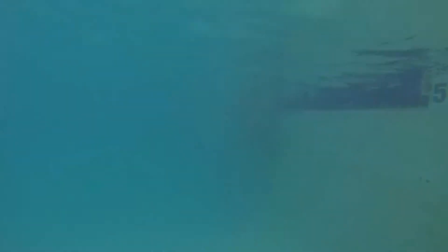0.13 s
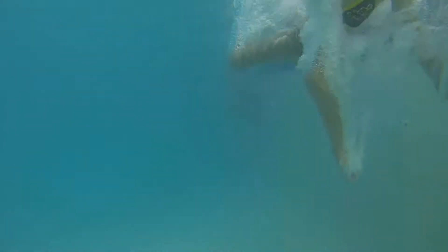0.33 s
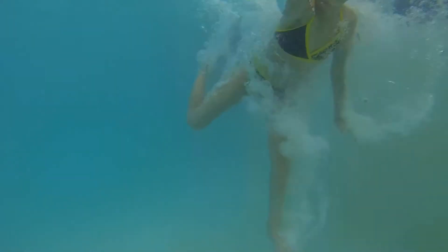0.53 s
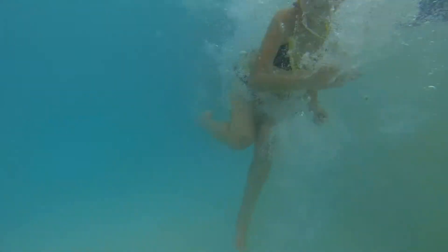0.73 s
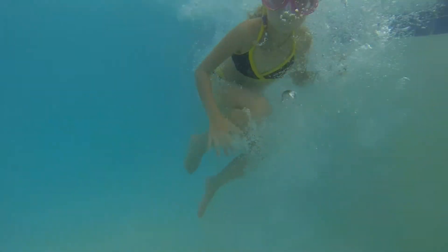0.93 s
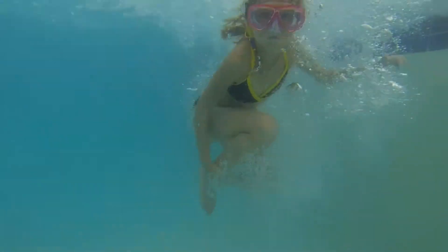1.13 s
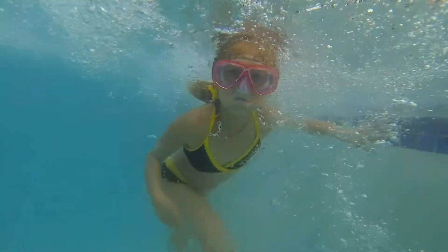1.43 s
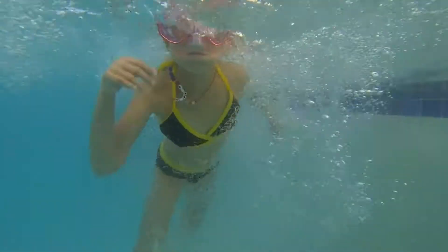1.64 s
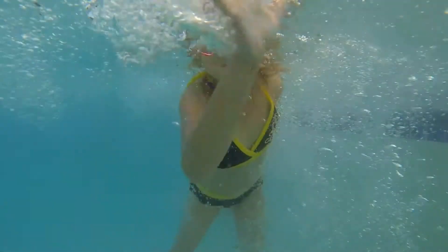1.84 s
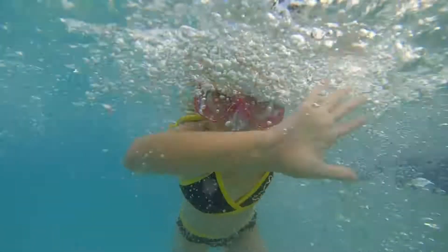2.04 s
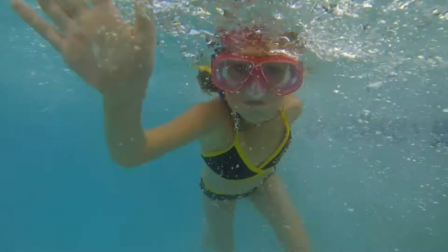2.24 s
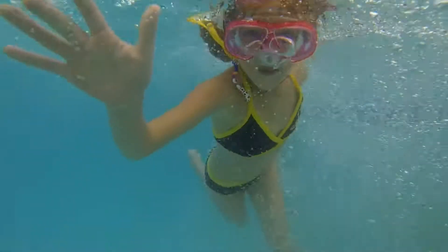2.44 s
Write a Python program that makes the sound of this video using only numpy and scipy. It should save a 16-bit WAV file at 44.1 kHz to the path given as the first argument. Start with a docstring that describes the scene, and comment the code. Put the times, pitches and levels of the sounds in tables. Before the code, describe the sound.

An underwater splash as a swimmer jumps into a pool: quick slaps break the surface and low surges push against the sunken microphone. Dull, hollow bubbling follows, with single bubbles plopping nearby and a few brief swishes.

```python
"""A low underwater swirl, then slaps and a rush of bubbles: a swimmer plunges into a pool.
Limbs slap through the surface and drag down air, which breaks into swarms of bubbles, huge to fine.
Single bubbles ring and glug close by, thin air films snap, and surges push the sealed housing of the
submerged microphone. The housing's resonances colour the swarms, slaps and swishes."""
import sys
import numpy as np
from scipy import signal
from scipy.io import wavfile

SR = 44100
rng = np.random.default_rng(int(sys.argv[2]) if len(sys.argv) > 2 else 0)


def waveform_to_disk(signal):
    """Save audio, clipped to [-1, 1], as 16-bit WAV at the path in sys.argv[1]."""
    frames = np.transpose(np.atleast_2d(signal))
    scaled = np.clip(frames, -1, 1) * 32767
    samples = np.round(scaled).astype(np.int16)
    wavfile.write(sys.argv[1], SR, samples)


N = 114660
ROUGH_DB, ROUGH_HZ = 4.5, 190   # neighbours jostle a bubble: level spread, rate


def amp(db):
    """Decibels to gain."""
    return 10 ** (np.asarray(db) / 20)


def unit_rms(x):
    """Scale to rms 1."""
    return x / np.sqrt(np.mean(x ** 2) + 1e-20)


def unit_peak(x):
    """Scale to peak 1."""
    return x / np.abs(x).max()


def drift(rate_hz):
    """Smooth random curve, rms 1."""
    r = np.exp(-2 * np.pi * rate_hz / SR)
    return unit_rms(signal.lfilter([1], [1, -2 * r, r * r], rng.standard_normal(N + SR))[SR:])


def butter(x, hz, kind, order=2):
    """Butterworth low- or high-pass."""
    return signal.sosfilt(signal.butter(order, min(hz, .45 * SR), kind, fs=SR, output="sos"), x)


def add(out, start_s, sound):
    """Mix a sound in at start_s."""
    i = int(start_s * SR)
    out[i:i + len(sound)] += sound[:len(out) - i]


def burst(length_s, noise):
    """Noise that peaks at a third of length_s and dies away, bass thinned."""
    age = np.arange(len(noise)) / SR / length_s
    return signal.lfilter([1, -.9], [1], noise * 3 * age * np.exp(1 - 3 * age))


def housing(x):
    """Housing wall: a dull direct path plus steep parallel resonances of alternating sign."""
    # Wall resonances. Each row: centre in Hz, width in Hz, gain in dB.
    modes = [(350, 148, -6), (463, 187, -8.5), (599.7, 96.4, 5.5), (934, 260, -7.5), (1320, 210, -18.5),
             (1559, 180, -7.5), (1740, 534, -15), (2450, 950, -23.5), (3285, 417, -26.5), (3980, 1500, -39),
             (6500, 1800, -54), (8800, 900, -52.5), (11500, 4600, -76)]
    out = amp(-1.5) * butter(x, 275, "low", order=4)
    for k, (hz, width_hz, db) in enumerate(modes):
        r = np.exp(-np.pi * width_hz / SR)
        stage = [(1 - r * r) / 2, 0, (r * r - 1) / 2, 1, -2 * r * np.cos(2 * np.pi * hz / SR), r * r]
        out = out + amp(db) * (-1) ** k * signal.sosfilt([stage, stage], x + 1e-18)
    return out


def swarm(level_db, low_hz, high_hz, births_per_s, t60_cycles, clump_db, wash_db, pitches=16):
    """Bubbles born in random clumps ring a few cycles each, over a wash of distant ones."""
    # The cloud thins to separate, nearer bubbles: start in s, end in s, share still born,
    # extra size spread in dB.
    thinning = (1.0, 1.6, .35, 1.3)
    start_s, end_s, share, extra_db = thinning
    thinned = np.clip((np.arange(N) / SR - start_s) / (end_s - start_s), 0, 1)
    clump = amp(clump_db * drift(rate_hz=22))
    birth_chance = births_per_s * share ** thinned * clump / SR
    births = (rng.random(N) < birth_chance) * rng.choice([-1, 1], N)
    spread_db = 2.4 + extra_db * thinned
    kicks = births * amp(spread_db * np.minimum(rng.exponential(1, N), 4.3))
    pitch_index = rng.integers(0, pitches, N)
    rings = np.zeros(N)
    for k, hz in enumerate(np.geomspace(low_hz, high_hz, pitches)):
        r, w = amp(-60 * hz / (t60_cycles * SR)), 2 * np.pi * hz / SR
        stage = [0, np.sin(w), 0, 1, -2 * r * np.cos(w), r * r]
        rings += (1 - r) * signal.sosfilt([stage, stage], kicks * (pitch_index == k) + 1e-18)
    wash = butter(butter(rng.standard_normal(N), low_hz, "high"), high_hz, "low") * np.sqrt(clump)
    heard = housing(unit_rms(rings) + amp(wash_db) * unit_rms(wash) * share ** (thinned / 4))
    return amp(level_db) * unit_rms(butter(heard, 1.212 * low_hz, "high", order=4))


def slaps(click=6, shove_hz=516, echo_db=-15, echo_decay_s=.011):
    """A limb breaks the surface: click and spray ring the housing, along with a dull shove."""
    # Surface hits. Each row: start in s, peak in dB, spray length in s, low-pass in Hz,
    # high-pass in Hz, shove relative to the knock in dB.
    hits = [(0.2379, -3, 0.00574, 5000, 1400, -11.5), (0.266, -20, 0.0036, 3500, 1500, -10.5),
            (0.2952, -8.5, 0.0068, 6040, 890, -6), (0.301, -4.5, 0.019, 680, 204, -5)]
    out, t = np.zeros(N), np.arange(SR // 8) / SR
    shove = -t * shove_hz * np.exp(1 - t * shove_hz) * np.cos(np.pi * shove_hz * t)
    for start_s, db, length_s, lowpass_hz, highpass_hz, shove_db in hits:
        noise = rng.standard_normal(len(t))
        pool_echo = amp(echo_db) * np.exp(-t / echo_decay_s) * (t > length_s) * noise[::-1]
        spray = burst(length_s, noise) + pool_echo
        spray[int(length_s * SR / 4)] -= click   # first contact
        spray = butter(spray, lowpass_hz, "low", order=1)
        knock = housing(butter(spray, highpass_hz, "high", order=1))
        add(out, start_s, amp(db) * unit_peak(unit_peak(knock) + amp(shove_db) * shove))
    return out


def bubbles(swell_cycles=1.3, rise_per_t60=.033, wobble_depth=.025):
    """Close bubbles: each sine swells in clean, then climbs a little and turns ragged as it dies."""
    # Single bubbles. Each row: start in s, level in dB, starting pitch in Hz, t60 in s.
    rings = [(.2385, -10, 987, 0.017), (0.2391, -6.5, 1737, 0.017), (0.2657, -18, 1586, 0.038),
             (.352, -14.5, 497, 0.017), (0.4387, -16, 1564, 0.037), (.497, -22.5, 350, 0.14),
             (.827, -17, 604, 0.037), (.925, -12.5, 597, 0.043), (.987, -20.5, 1546, 0.043),
             (1.0531, -21, 1665, 0.021), (1.1359, -18.5, 1510, 0.024), (1.156, -23, 279, 0.098),
             (.403, -17.5, 597, 0.14), (1.549, -29.5, 2580, 0.016), (1.3045, -4, 1746, 0.017),
             (1.3045, -12.5, 2524, 0.016), (1.323, -18, 398, 0.068), (1.35, -23.5, 350.3, 0.46),
             (1.392, -24, 1950, 0.027), (1.4497, -5.5, 559, 0.048), (1.4477, -12, 341.5, 0.06),
             (1.456, -27, 2690, 0.014), (1.475, -32.5, 4700, 0.005), (1.5794, -9.5, 1682, 0.023),
             (1.5794, -14, 1870, 0.024), (1.6102, -27.5, 3960, 0.011), (1.626, -17.5, 1094, 0.028),
             (1.876, -18.5, 308, 0.07), (1.888, -13.5, 568, 0.034), (1.915, -24.5, 1880, 0.052),
             (1.968, -16.5, 604, 0.022), (2.021, -9.5, 595, 0.073), (2.025, -43.5, 4430, 0.011),
             (2.045, -19, 506, 0.082), (2.0902, -28.5, 3060, 0.023), (2.0907, -38.5, 4340, 0.013),
             (2.12, -22.5, 1860, 0.027), (2.122, -28, 2450, 0.033), (2.137, -25, 1560, 0.05),
             (2.169, -20.5, 1707, 0.03), (2.181, -20, 1483, 0.025), (2.295, -21, 575, 0.07),
             (2.319, -14.5, 563, 0.038), (2.331, -12, 574, 0.048), (2.306, -33.5, 1590, 0.023),
             (2.39, -29.5, 1580, 0.066), (2.4, -47, 4230, 0.012), (2.495, -31, 1610, 0.019),
             (2.51, -35.5, 1640, 0.035), (2.255, -26, 611, 0.17), (2.389, -21.5, 934, 0.034),
             (2.452, -29, 1150, 0.036), (2.464, -20, 554, 0.041), (2.511, -22.5, 764, 0.035),
             (2.567, -36.5, 2900, 0.014), (2.591, -39.5, 3280, 0.039)]
    out = np.zeros(N)
    jostle, wobble = amp(ROUGH_DB * drift(ROUGH_HZ)), drift(ROUGH_HZ)
    for (start_s, db, hz, t60_s), offset in zip(rings, rng.integers(0, N - SR, len(rings))):
        t = np.arange(int(1.5 * t60_s * SR)) / SR
        span = slice(offset, offset + len(t))
        envelope = (1 - np.exp(-t * hz / swell_cycles)) ** 2 * amp(-60 * t / t60_s)
        ragged = np.minimum(2 * t / t60_s, 1)
        pitch_hz = hz * (1 + rise_per_t60 * t / t60_s + wobble_depth * ragged * wobble[span])
        tone = np.sin(2 * np.pi * np.cumsum(pitch_hz) / SR)
        add(out, start_s, amp(db) * jostle[span] ** ragged * unit_peak(envelope) * tone)
    return out


def surges(t60_cycles=3.5, pull_depth=.45):
    """Water draws the housing back for half a swing, then pushes it; it settles fast."""
    # Surges. Each row: start of the push in s, peak in dB, pitch in Hz.
    pushes = [(0.243, -15.5, 31.7), (0.306, -13, 39), (0.3528, -8, 64), (0.396, -14, 70),
              (0.414, -10, 31.6), (0.4404, -3, 47.8), (0.534, -19.5, 56), (0.573, -21, 59.2),
              (0.641, -17, 35), (0.718, -9, 63), (1.149, -22.5, 33), (1.325, -15, 30), (1.507, -22, 27.7),
              (1.581, -13.5, 22.1), (1.612, -20, 110), (1.783, -25, 24), (0.44, -15.5, 150),
              (1.886, -26, 60), (2.065, -19, 24), (2.108, -22, 25.1), (2.302, -24, 31.4)]
    out = np.zeros(N)
    for push_s, db, hz in pushes:
        pull_s = .5 / hz
        t = np.arange(SR // 3) / SR - pull_s
        envelope = np.where(t < 0, pull_depth * np.cos(np.pi * hz * t), amp(-60 * t * hz / t60_cycles))
        swing = envelope * np.sin(2 * np.pi * hz * t)
        add(out, push_s - pull_s, amp(db) * swing / swing.max())
    return out


def glugs():
    """Air pockets slide in pitch as they change size; each swells fast and fades slowly."""
    # Air pockets. Each row: start in s, level in dB, first pitch in Hz, last pitch in Hz, length in s.
    pockets = [(0.05, -41.5, 390, 480, 0.037), (0.736, -19, 643, 913, 0.028), (1.61, -12, 558, 635, 0.026),
               (2.002, -24, 386, 334, 0.035), (2.019, -15, 334, 433, .065)]
    out, jostle = np.zeros(N), amp(ROUGH_DB / 2 * drift(ROUGH_HZ))
    for start_s, db, first_hz, last_hz, length_s in pockets:
        age = np.arange(int(length_s * SR)) / (length_s * SR)
        pitch_hz = first_hz + (last_hz - first_hz) * age ** 2
        tone = np.sin(2 * np.pi * np.cumsum(pitch_hz) / SR)
        add(out, start_s, amp(db) * np.sin(np.pi * np.sqrt(age)) * tone)
    return out * jostle


def swishes():
    """A limb drags air down: a broad rush, heard through the housing."""
    # Limb strokes. Each row: start in s, peak in dB, length in s, low-pass in Hz.
    strokes = [(1.603, -18.5, 0.025, 4000), (1.857, -21, 0.062, 4000), (2.007, -20, 0.061, 1160)]
    out = np.zeros(N)
    for start_s, db, length_s, lowpass_hz in strokes:
        rush = butter(burst(length_s, rng.standard_normal(SR // 2)), lowpass_hz, "low")
        add(out, start_s, amp(db) * unit_peak(housing(rush)))
    return out


def snaps(decay_s=.0006, low_hz=2800, high_hz=12000):
    """Thin air films snap: bright spits of noise, too brief to move the wall."""
    # Snapping films. Each row: start in s, peak in dB.
    films = [(0.2373, -45), (.2412, -45), (.2978, -36), (0.299, -32), (1.446, -34.5), (1.4694, -36)]
    out, t = np.zeros(N), np.arange(SR // 100) / SR
    for start_s, db in films:
        spit = rng.standard_normal(len(t)) * np.exp(-t / decay_s)
        spit = butter(butter(spit, low_hz, "high"), high_hz, "low")
        add(out, start_s, amp(db) * unit_peak(spit))
    return out


def swirl(level_db, low_hz=20, high_hz=60, lump_db=2.5, trim_db=-2):
    """Moving water rocks the housing: lumpy low noise."""
    noise = rng.standard_normal(N + SR)
    rumble = butter(butter(noise, low_hz, "high"), high_hz, "low", order=3)[SR:]
    lumps = amp(lump_db * drift(rate_hz=8.1))
    return amp(level_db + trim_db) * unit_rms(rumble * lumps)


def scene():
    """All sources summed at one microphone."""
    # Water activity. Each row: time in s, then levels in dB of the huge, large, small and fine
    # swarms and of the swirl before its trim.
    activity = [(0, -57.5, -56.5, -53.5, -72, -28.5), (.2, -92, -47.5, -52, -71.5, -30),
                (0.249, -45, -74, -55.5, -71, -25.5), (.32, -46, -44.5, -45, -56.5, -42),
                (0.342, -52, -34.5, -34, -44.5, -24), (.42, -36, -28.5, -30.5, -51.5, -22.5),
                (.47, -37.5, -29, -37.5, -61.5, -19), (0.702, -34.5, -24.5, -33.5, -50.5, -27),
                (0.85, -33.5, -24, -32, -52.5, -33.5), (0.973, -34, -26, -38.5, -56.5, -41.5),
                (1.1, -42.5, -31, -39, -57, -35.5), (1.25, -36, -31, -36, -57.5, -34),
                (1.36, -43.5, -23, -37.5, -54, -32.5), (1.5, -34, -30, -35.5, -48.5, -30),
                (1.661, -59.5, -28, -33.5, -52.5, -40.5), (1.837, -43, -42, -39.5, -60.5, -40),
                (1.876, -30, -25, -32, -56, -40), (1.96, -44, -25, -35.5, -59, -36),
                (2.049, -64, -21.5, -46.5, -57, -29.5), (2.149, -54.5, -28.5, -32.5, -56, -44),
                (2.319, -43.5, -23.5, -50.5, -60.5, -32.5), (2.439, -50, -34, -44.5, -60.5, -41.5),
                (2.6, -51, -36, -51, -66.5, -37)]
    # Swarms, huge bubbles to fine. Each row: lowest and highest pitch in Hz, base births per s,
    # t60 of one resonator stage in cycles, clumping in dB, distant wash in dB.
    size_bands = [(95.5, 256.3, 160, 8.2, 4, -4.5), (290, 1322, 1000, 5.17, 4, -1),
                  (1150, 3650, 2000, 9.4, 3.5, -4.5), (3134, 13000, 5100, 26, 3.5, -1)]
    times_s, *columns_db = np.transpose(activity)
    *swarms_db, swirl_db = [np.interp(np.arange(N) / SR, times_s, db) for db in columns_db]
    cloud = sum(swarm(db, *band) for db, band in zip(swarms_db, size_bands))
    return (cloud + slaps() + snaps() + glugs() + swishes() + bubbles() + surges() + swirl(swirl_db))[None]


def record(dry, ceiling=1.3, hiss_db=-70, cutoff_hz=15700):
    """Sub-bass cut, rounded peaks, faint hiss, steep top cut."""
    x = butter(dry, 10, "high", order=1)
    x = x / (1 + (x / ceiling) ** 4) ** (1 / 4)
    x = x + amp(hiss_db) * butter(rng.standard_normal(N), 11500, "low")
    return signal.sosfilt(signal.cheby2(12, 60, cutoff_hz, fs=SR, output="sos"), x)


dry = scene()
out = record(dry)
waveform_to_disk(out)
```